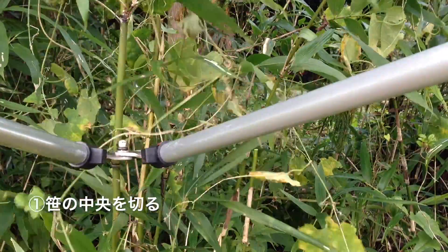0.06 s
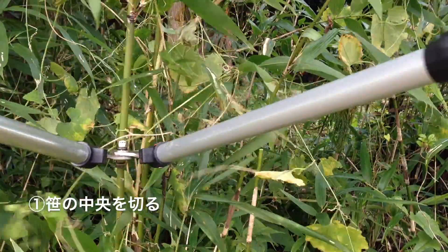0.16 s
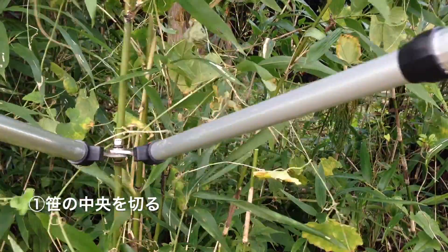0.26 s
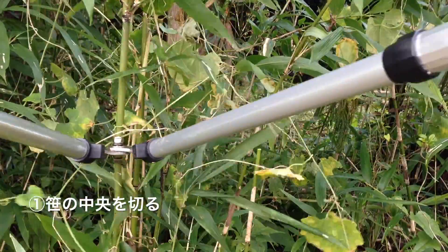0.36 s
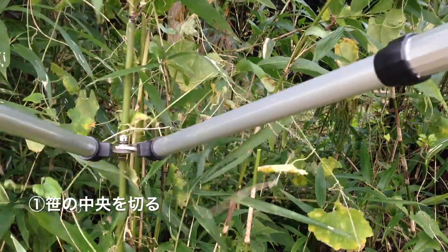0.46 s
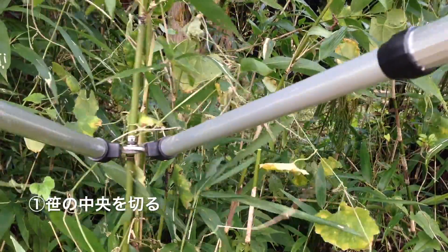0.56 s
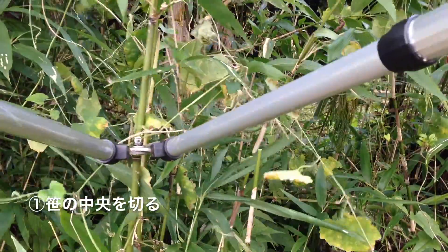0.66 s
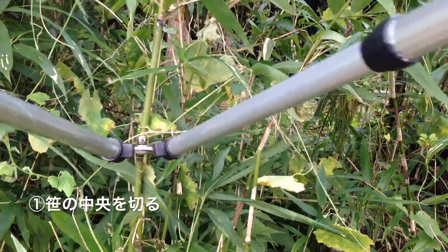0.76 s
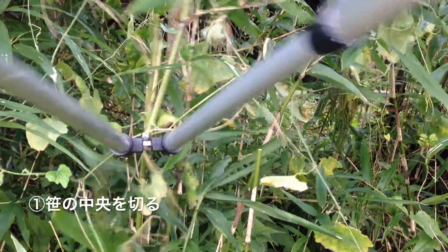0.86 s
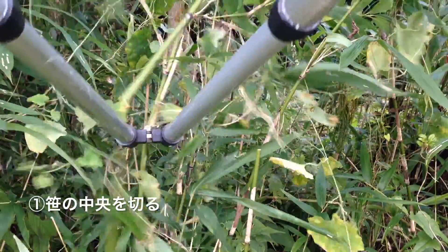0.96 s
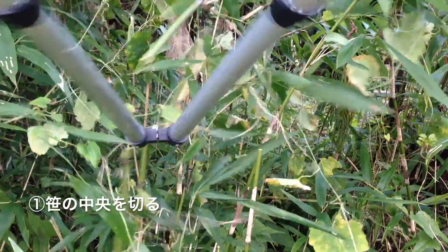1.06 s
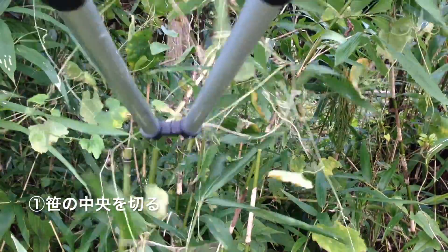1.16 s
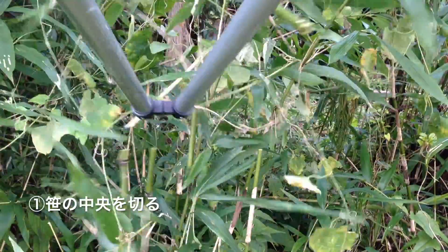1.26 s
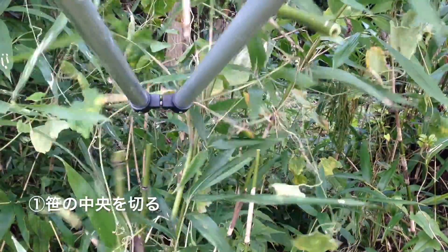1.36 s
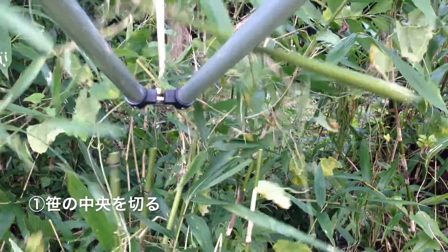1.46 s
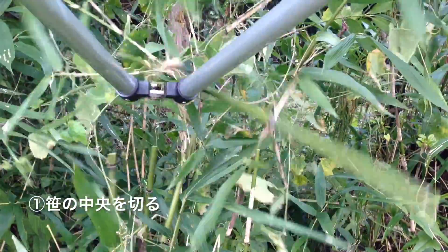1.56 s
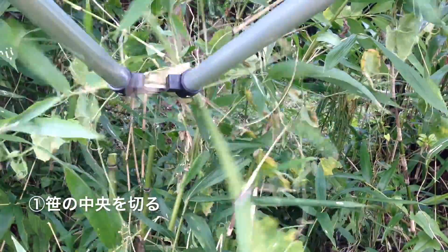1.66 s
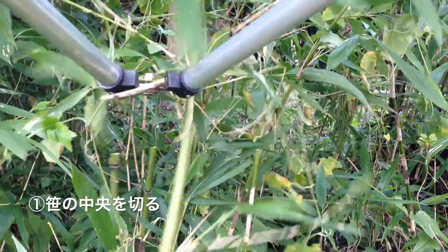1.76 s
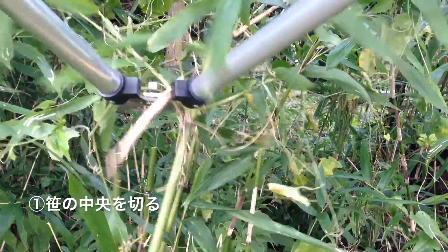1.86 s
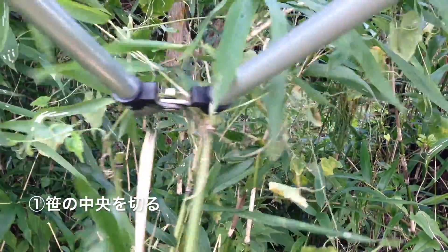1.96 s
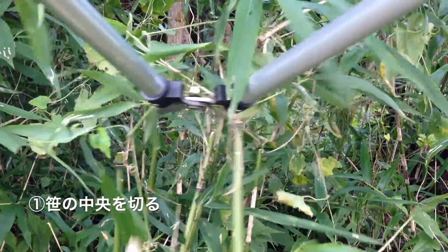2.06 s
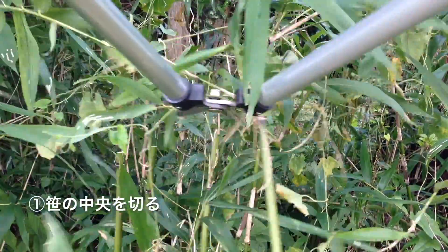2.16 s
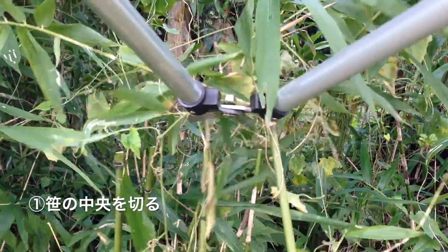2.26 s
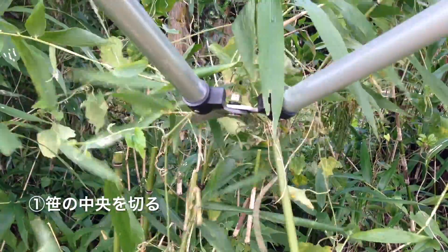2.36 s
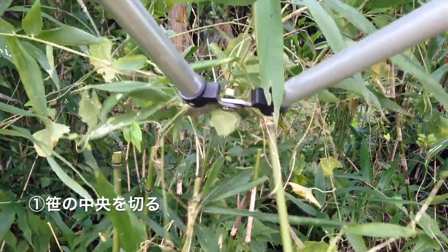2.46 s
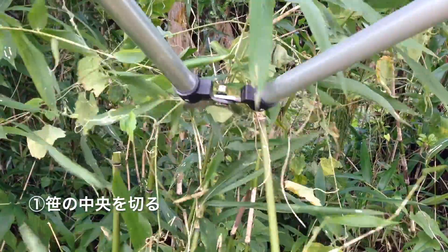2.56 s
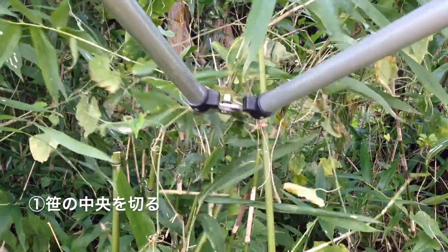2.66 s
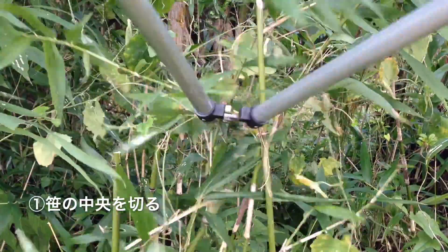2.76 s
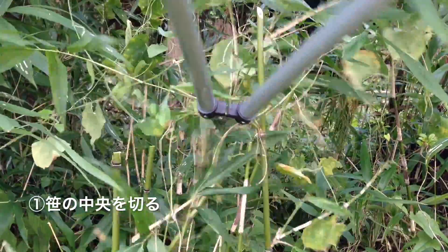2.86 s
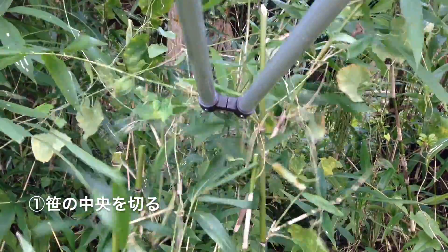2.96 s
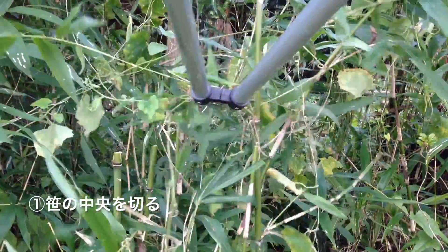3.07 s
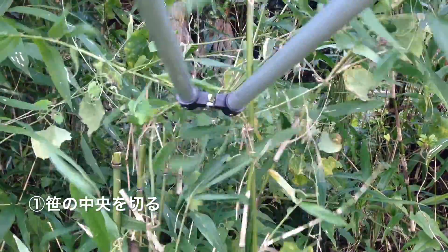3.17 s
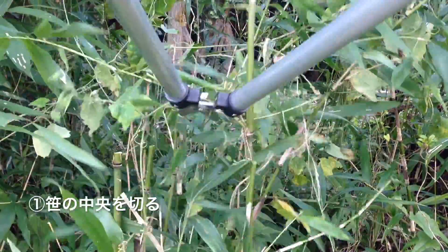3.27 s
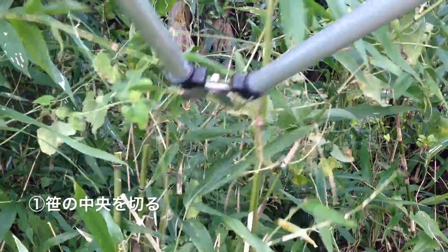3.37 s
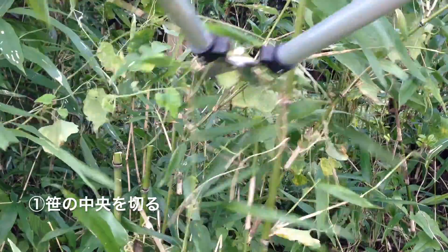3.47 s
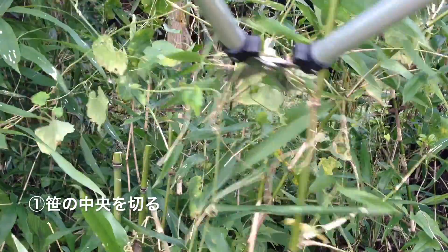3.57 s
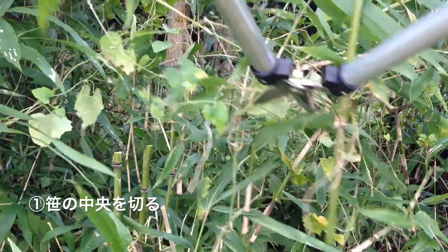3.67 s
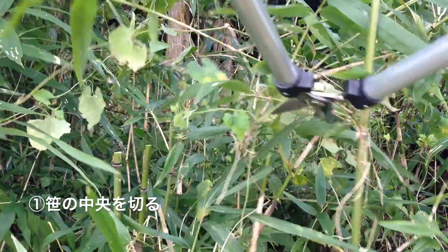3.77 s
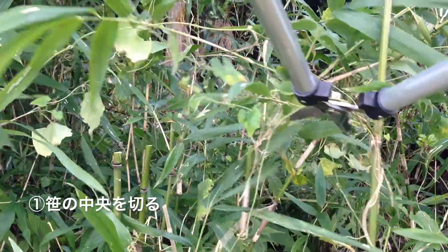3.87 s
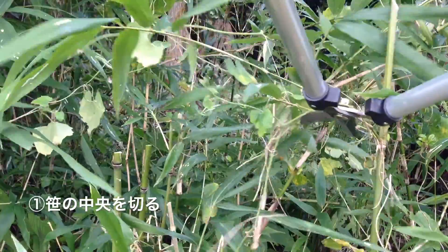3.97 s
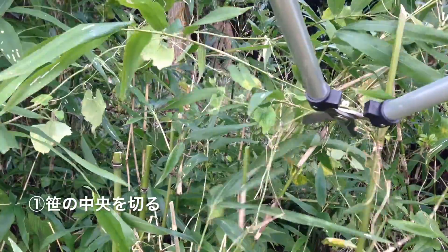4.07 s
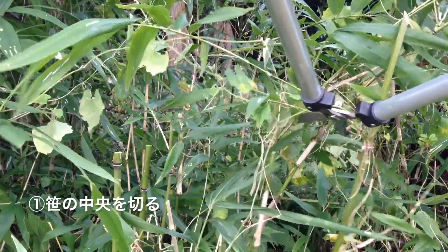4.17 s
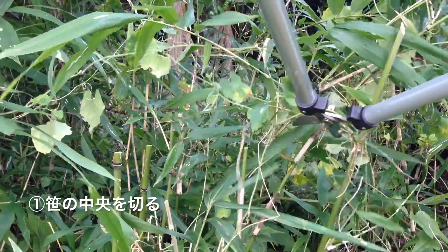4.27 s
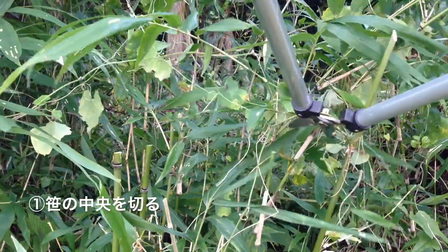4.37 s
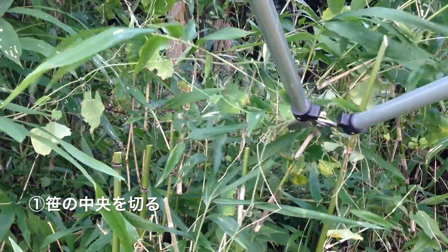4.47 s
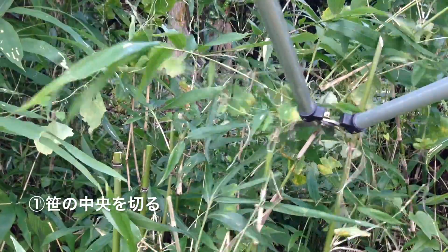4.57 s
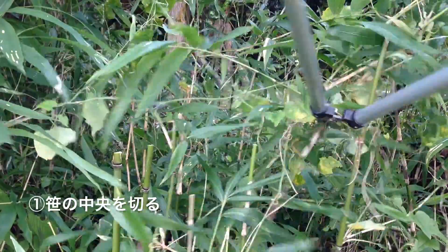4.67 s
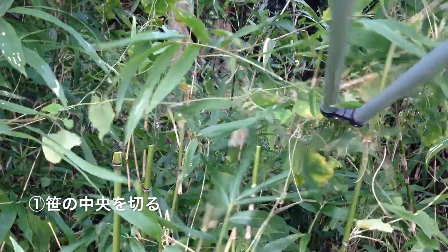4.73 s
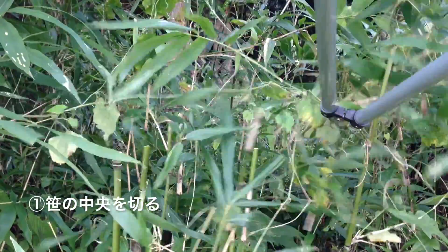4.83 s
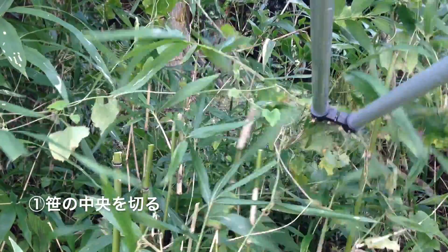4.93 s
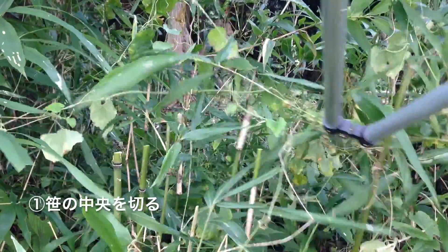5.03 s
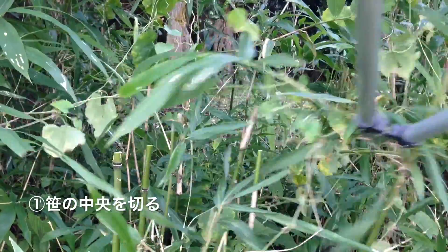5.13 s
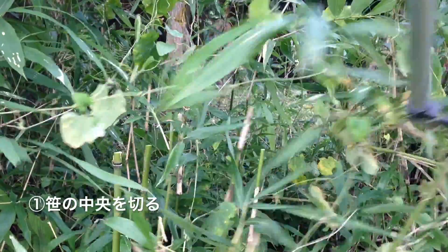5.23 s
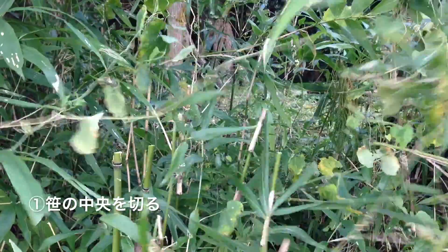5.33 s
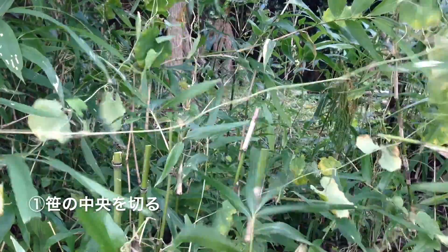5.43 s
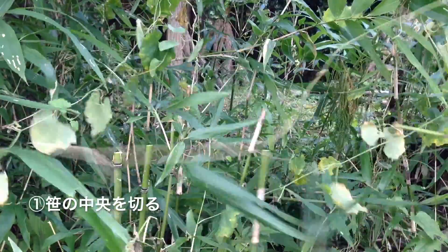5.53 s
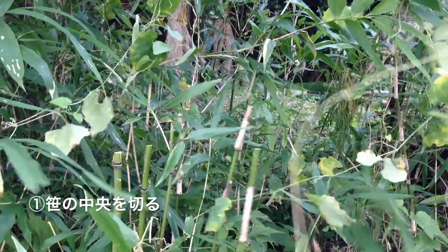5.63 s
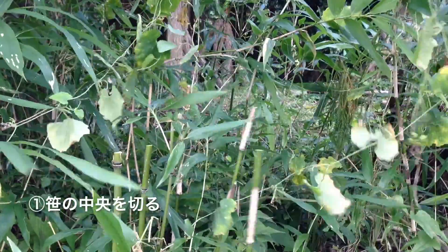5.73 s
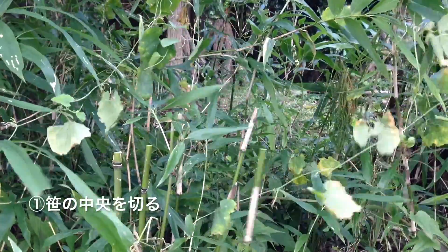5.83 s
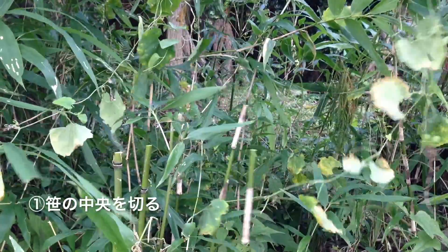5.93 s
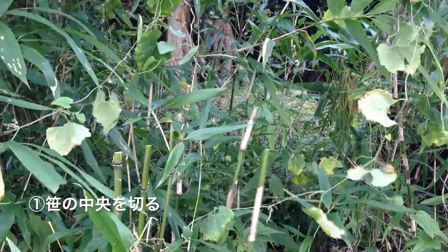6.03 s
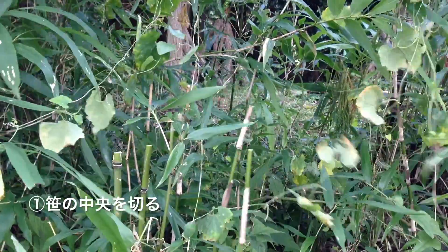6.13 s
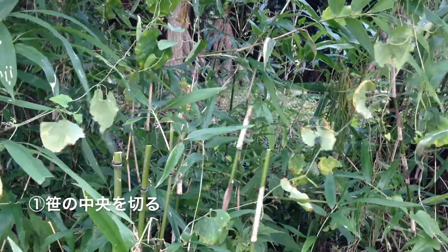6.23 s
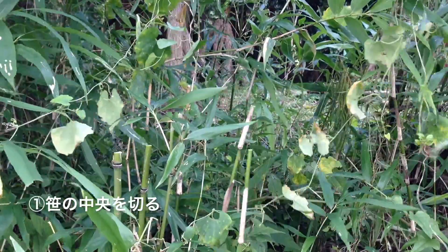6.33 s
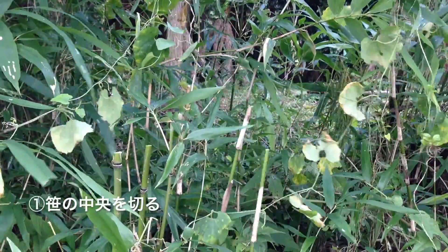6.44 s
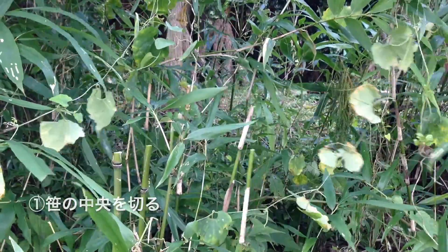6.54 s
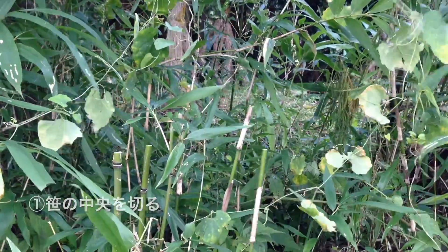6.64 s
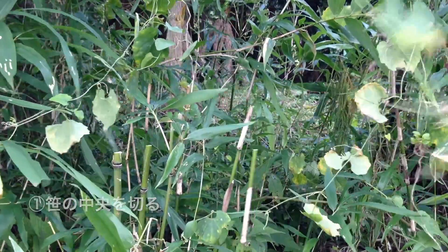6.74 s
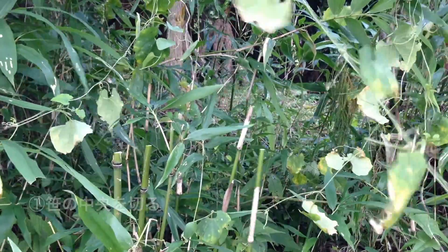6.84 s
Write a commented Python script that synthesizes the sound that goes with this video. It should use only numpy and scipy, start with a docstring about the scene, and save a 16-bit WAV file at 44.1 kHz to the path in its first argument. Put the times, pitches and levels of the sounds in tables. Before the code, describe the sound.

Close, dry snaps and tearing fibres as cutters sever bamboo three times, leaves swishing between cuts over a soft, low far-off engine drone.

```python
"""Long-handled loppers cut three bamboo stems in a thicket, close by: runs of cracks and tearing fibres,
made of filtered click bursts that ring the tool's damped modes, with bumps, creaks and chirps of the blades.
After the first cut, canes knock with modes of their own. Leaves rustle and flick as filtered noise and ticks.
Behind them a far engine hums as wavering harmonics over filtered-noise outdoor air."""
import sys
import numpy as np
from scipy import signal
from scipy.fft import rfft, irfft
from scipy.io import wavfile

SR = 44100
rng = np.random.default_rng(int(sys.argv[2]) if len(sys.argv) > 2 else 0)


def wav_record(signal):
    """Record a signal, one row per channel, as 16-bit PCM in the file named by sys.argv[1]."""
    frames = np.transpose(np.atleast_2d(signal))
    bounded = np.clip(frames, -1, 1)
    # unit amplitude maps onto the largest positive 16-bit level
    quanta = np.round(bounded * 32767).astype(np.int16)
    wavfile.write(sys.argv[1], SR, quanta)


N = 304290
TIME = np.arange(N) / SR
HIT = TIME[:8192]  # time axis of one short event
LEAD_S = 0.004  # room for fibres giving before an event's nominal time

# damped modes of tool and clamped stem: hz, relative_db, t60_s
TOOL_MODES = [(185, 0, 0.052), (390, -5, 0.042), (450, -15, 0.055), (550, -13, 0.037), (678, -16, 0.055),
              (1214, 6, 0.046), (1330, 2, 0.035), (1560, -4, 0.035), (1760, 4, 0.016), (1800, -4, 0.047),
              (1970, -13, 0.067), (2380, -19, 0.042), (2990, -5, 0.041), (3320, 1, 0.028),
              (4360, -3, 0.033), (5470, 6, 0.015)]
# spectral outline of a crack's low thump: hz, gain_db
THUD_OUTLINE = [(30, -30), (90, -4.5), (170, -3), (280, -5.5), (420, 4), (680, 0.5), (950, -8.5),
                (1800, -54)]
# spectral outline of a crack's woody middle: hz, gain_db
WOOD_OUTLINE = [(500, -26.5), (950, -12.5), (1250, -4), (1700, 0.5), (2200, -5), (2700, -4), (4500, -18),
                (9000, -39.5)]
# spectral outline of a crack's bright splinters: hz, gain_db
SPLINTER_OUTLINE = [(1200, -27.5), (2500, -3.5), (3800, 5), (6000, -2), (9000, -1.5), (12000, -9.5),
                    (16000, -2)]


def undb(db):
    """Decibels to gain."""
    return 10 ** (np.asarray(db) / 20)


def unit(x):
    """Scale to rms 1."""
    return x / np.sqrt(np.mean(x ** 2))


def attack_level(x, db):
    """Set the rms of the six milliseconds after a hit's lead-in."""
    start = int(LEAD_S * SR)
    return x * undb(db) / np.sqrt(np.mean(x[start:start + 265] ** 2))


def curve(table):
    """Join (time_s, value) points by straight lines."""
    time_s, value = np.transpose(table)
    return np.interp(TIME, time_s, value)


def colour(x, outline):
    """Minimum-phase filter with the given (hz, gain_db) outline, built by folding the cepstrum."""
    hz, db = np.transpose(outline)
    grid_hz = np.maximum(np.fft.rfftfreq(4096, 1 / SR), 1)
    gain_db = np.interp(np.log(grid_hz), np.log(hz), db)
    cepstrum = irfft(np.log(undb(gain_db)))
    half = len(cepstrum) // 2
    cepstrum[1:half] *= 2
    cepstrum[half + 1:] = 0
    impulse = irfft(np.exp(rfft(cepstrum)))[:half]
    return signal.fftconvolve(x, impulse)[:len(x)]


def walk(rate_hz):
    """Random values joined by straight lines, rms 1."""
    knots_s = np.arange(0, TIME[-1] + 1, 1 / rate_hz)
    return unit(np.interp(TIME, knots_s, rng.standard_normal(len(knots_s))))


def clicks(n, rate_hz, spread_db):
    """Random tiny clicks, mostly weak and a few strong, rms 1."""
    chance = rng.random(n)
    size = rng.exponential(size=n)
    sign = rng.choice([-1, 1], n)
    return unit(sign * (chance < rate_hz / SR) * undb(spread_db * np.minimum(size, 5)) + 1e-9)


def add(out, start_s, x):
    """Mix a sound in at start_s."""
    i = int(start_s * SR)
    out[i:i + len(x)] += x[:len(out) - i]


def ring(force, modes, ring_db, ratio=1):
    """A force heard directly and through the damped modes that it excites."""
    response = 0
    for hz, db, t60_s in modes:
        decay = undb(db + ring_db - 60 * HIT / t60_s)
        response = response + decay * np.cos(2 * np.pi * hz * ratio * HIT)
    return force + signal.fftconvolve(force, response)[:len(force)]


def fracture(fade_ms, first_db, rise_ms):
    """Fibres start to give, the main break follows, and a shower of small ones dies away."""
    peak_s = LEAD_S + 0.001
    ms = (HIT - peak_s) * 1000
    envelope = np.exp(np.minimum(ms / rise_ms, -ms / fade_ms))
    fibres = clicks(len(HIT), rate_hz=12000, spread_db=2.0) * envelope
    fibres /= np.max(np.abs(fibres))
    add(fibres, peak_s, np.array([undb(first_db)]))  # main break, relative to the strongest fibre
    return fibres


def stroke(start_s, length_s, slope_db_per_s, attack_s, release_s):
    """Envelope of one push: attack, a sloping hold, release."""
    t = TIME - start_s
    attack = np.clip(t / attack_s, 0, 1)
    hold = undb(slope_db_per_s * np.clip(t, 0, length_s))
    return attack * hold * np.exp(-np.maximum(t - length_s, 0) / release_s)


def distance():
    """A far engine's low harmonics waver over soft outdoor air; the overtones swell once and fade."""
    # engine speed: time_s, cycle_rate_hz
    engine_speed = [(0, 57.6), (1.5, 58), (2.6, 58.8), (3.5, 58), (4.2, 58.96), (6.9, 60.17)]
    # firing tone at twice the cycle rate: time_s, level_db
    engine_level = [(0, -62), (.5, -61.5), (2.0, -64.5), (2.45, -70), (3.1, -62.5), (4.55, -61),
                    (5.9, -65.5), (6.55, -69), (6.9, -85)]
    # harmonics of the cycle rate: multiple, level_db, swell_rise_db
    overtones = [(3, -71.5, 7), (4, -78, 9.5), (5, -88.5, 10.5), (6, -84, 8), (7, -99, 8), (8, -94, 21.5)]
    # spectral outline of outdoor air: hz, gain_db
    air_outline = [(25, -19), (50, -3), (85, 3), (130, 2), (250, -6), (500, -8.5), (1000, -18), (3000, -17),
                   (8000, -23), (15000, -10.5)]
    swell_s, swell_width_s, air_db = 4.42, 0.85, -62.5
    swell = np.exp(-((TIME - swell_s) / swell_width_s) ** 2)
    cycle_hz = curve(engine_speed) * (1 + 0.0023 * walk(12))
    phase = 2 * np.pi * np.cumsum(cycle_hz) / SR
    hum = np.sin(2 * phase) * undb(curve(engine_level) + 0.32 * walk(5.4))
    for multiple, db, swell_db in overtones:
        waver_db = 1.6 * walk(5)
        hum += np.sin(multiple * phase) * undb(db + swell_db * swell + waver_db)
    air = unit(colour(rng.standard_normal(N), air_outline)) * undb(air_db)
    return np.sqrt(2) * hum + air  # sqrt(2): sine levels are rms


def crinkles(count):
    """Tiny buckling ticks of leaves: damped sines, each with its own pitch, size and decay."""
    out, t = np.zeros(N), HIT[:256]
    for when, pitch, size, cycles in rng.random((count, 4)):
        hz = 2400 * 6 ** pitch
        tick = np.sin(2 * np.pi * hz * t) * np.exp(-t * hz / (0.5 + cycles))
        size_db = -24 * np.sqrt(size)
        add(out, when * TIME[-1], tick * undb(size_db) * np.sqrt(hz))
    return unit(out)


def stirring():
    """Gains of leaves and twigs: slow stirring and the brushes add as powers."""
    # stirring by tool and leaning canes: time_s, leaf_level_db (before leaf_trim_db)
    stir = [(0.0, -63.5), (0.27, -58.5), (0.57, -60.5), (0.83, -62), (1.04, -48), (1.4, -48.5),
            (2.09, -54.5), (2.71, -56), (2.9, -51.5), (3.48, -53.5), (3.75, -59.5), (4.34, -58),
            (4.73, -53.5), (4.86, -48.5), (5.17, -49.5), (5.69, -45), (6.63, -51), (6.9, -44)]
    # leafy cane shaken or brushing neighbours: peak_s, leaf_level_db, twig_level_db, fade_time_constant_s
    brushes = [(.07, -54, -62.5, 0.1), (.29, -69, -56.5, .03), (.44, -62, -68, 0.091),
               (.95, -37, -47, 0.05), (1.22, -53, -54.5, 0.082), (1.52, -60, -49, .03),
               (1.62, -45.5, -47.5, 0.015), (1.825, -45, -57.5, 0.044), (1.9, -50, -60, 0.034),
               (2.25, -51, -66, 0.051), (2.43, -53, -57, 0.036), (2.761, -61, -60, 0.046),
               (2.89, -44.5, -53, 0.1), (3.58, -55, -62, 0.14), (3.97, -58, -67, 0.063),
               (4.15, -55.5, -78, 0.03), (4.78, -37, -48, 0.067), (5.25, -48, -72, 0.042),
               (5.47, -46.5, -53, 0.053), (5.8, -47, -66, 0.038), (6.15, -49.5, -52, 0.042),
               (6.775, -41.5, -55.5, 0.056)]
    leaf_trim_db, usual_stir_db = -0.24, -50
    twig_db, twig_growth = -11, 0.97  # twigs against leaves at usual stir; twig dB per leaf dB
    rise_share = 0.86  # rise time constant over fade time constant
    stir_db = curve(stir) + leaf_trim_db
    twig_stir_db = usual_stir_db + twig_db + twig_growth * (stir_db - usual_stir_db)
    leaf_power = undb(stir_db) ** 2
    twig_power = undb(twig_stir_db) ** 2
    for peak_s, leaf_level_db, twig_level_db, fade_s in brushes:
        swell = np.exp(np.minimum((TIME - peak_s) / rise_share, peak_s - TIME) / fade_s)
        leaf_power = leaf_power + (undb(leaf_level_db) * swell) ** 2
        twig_power = twig_power + (undb(twig_level_db) * swell) ** 2
    return np.sqrt(leaf_power), np.sqrt(twig_power)


def foliage():
    """Leaves slide and crinkle in uneven little swells of changing brightness; twigs scrape lower down."""
    # spectral outline of leaves: hz, gain_db
    leaf_outline = [(700, -33), (1500, -5), (2500, -5.5), (4000, 0.5), (5500, 0), (8000, 0), (11000, -1.5),
                    (15000, -3.5)]
    # spectral outline of twigs: hz, gain_db
    twig_outline = [(150, -14), (400, -3), (900, -4.5), (1600, -1.5), (2400, 0.5), (3200, -1.5),
                    (5000, -13.5)]
    leaf_gain, twig_gain = stirring()
    slide = 0
    for hz in (3000, 4500, 6700, 9500, 13500):  # bands waver independently
        band = [(hz / 4, -30), (hz / 1.5, -7), (hz, 0), (hz * 1.5, -7), (hz * 4, -30)]
        rub = colour(rng.standard_normal(N), band)
        slide = slide + rub * undb(1.8 * walk(30))
    leaves = unit(colour(unit(slide) + undb(-6.0) * crinkles(count=8000), leaf_outline))
    twigs = unit(colour(clicks(N, rate_hz=3500, spread_db=2.5), twig_outline))
    return (leaves * leaf_gain + twigs * twig_gain) * undb(1.35 * walk(55))


def flicks():
    """A stiff leaf slips free with a short papery burst."""
    # leaves flicking past stems and handles: time_s, level_db, centre_hz, fade_time_constant_ms
    leaf_flicks = [(.252, -50.5, 7140, 10), (.298, -55, 3500, 3), (0.339, -52, 10500, 4),
                   (.7795, -45, 11000, 4), (1.005, -40, 7840, 2.2), (1.1695, -39, 9100, 2.7),
                   (1.276, -43.5, 7000, 10), (1.846, -46, 5000, 3), (1.941, -48.5, 10000, 11),
                   (2.2703, -48, 8500, 3.5), (2.337, -50.5, 4000, 5), (2.389, -49, 13000, 6.5),
                   (2.415, -50, 4460, 2.6), (2.69, -53, 3900, 14), (3.632, -42, 8200, 5),
                   (3.7215, -52, 7010, 3.4), (5.4374, -36, 7640, 5.9), (5.905, -43, 11940, 7),
                   (6.022, -48, 3230, 35), (6.139, -44, 5510, 6), (6.3483, -45, 4470, 1.7),
                   (6.6307, -46.5, 6860, 16), (6.7484, -37.5, 5130, 7.3)]
    out = np.zeros(N)
    for s, db, hz, fade_ms in leaf_flicks:
        force = fracture(fade_ms, first_db=-3, rise_ms=0.29 * fade_ms)
        burst = colour(force, [(hz / 20, -20), (hz * 0.4, -9), (hz, 0), (hz * 2.44, -12)])
        add(out, s - LEAD_S, attack_level(burst, db))
    return out


def canes():
    """Cut canes strike their neighbours and scrape on; a ratio shifts the modes for each knock."""
    # loose canes knocking: time_s, level_db, pitch_ratio, strike_fade_time_constant_ms
    knocks = [(1.4646, -25, 0.96, 0.86), (1.497, -35.5, 1.03, 1.8), (1.582, -36, 1.1, 6.9),
              (1.614, -39.5, 1.2, 2.1), (1.741, -46, 1.6, 2.9), (1.751, -40, 1.38, 2.6),
              (2.061, -43, 1., 12), (2.068, -50, 1.2, 9.6), (2.455, -47, 1.17, 1.8)]
    # damped modes of a hollow cane at pitch ratio 1: hz, relative_db, t60_s
    cane_modes = [(524, -5.5, 0.03), (1294, -6.5, 0.051), (1775, -8.5, 0.022), (2080, -2, 0.026),
                  (2370, 2, 0.017), (2860, 14, 0.0094), (3170, 14.5, 0.013), (3950, 10, 0.015),
                  (4430, 10, 0.018), (7460, -5, 0.025)]
    body = [(60, -27), (250, -18), (600, -3.5), (2000, 0.5), (4500, -10), (8000, -3), (15000, -7)]
    out = np.zeros(N)
    for s, db, ratio, strike_fade_ms in knocks:
        strike = fracture(strike_fade_ms, first_db=5.0, rise_ms=0.34)
        scrape = undb(-19) * fracture(12, first_db=-13, rise_ms=2.8)
        knock = ring(strike + scrape, cane_modes, ring_db=-14, ratio=ratio)
        add(out, s - LEAD_S, attack_level(colour(knock, body), db))
    return out


def creak():
    """Dense stick and slip of steel on stem, heard through the tool, growing with the load."""
    # blade creaking under load: start_s, length_s, start_level_db
    creaks = [(0.779, 0.15, -52), (3.155, 0.087, -60.5)]
    slope_db_per_s, attack_s, release_s = 35, 0.01, 0.037
    slips = ring(clicks(N, rate_hz=1500, spread_db=2.5), TOOL_MODES, ring_db=-49)
    body = colour(slips, [(80, -10), (200, 1.0), (500, 1.5), (900, -6.5), (1400, -0.5), (2000, -2.5),
                          (2800, -18), (8000, -15)])
    push = sum(undb(db) * stroke(s, length_s, slope_db_per_s, attack_s, release_s)
               for s, length_s, db in creaks)
    return unit(body) * push


def chirps():
    """A slipping blade rings for a few cycles on one pitch."""
    # blade chattering against steel or stem: start_s, peak_level_db, pitch_hz, ring_time_constant_ms
    chatters = [(1.112, -39, 1740, 3.2), (1.124, -32, 1650, 4.5), (4.776, -34.5, 2010, 6.5),
                (4.8, -31, 1630, 4.2)]
    out = np.zeros(N)
    for s, db, hz, ring_ms in chatters:
        ms = HIT * 1000
        swell = (1 - np.exp(-ms / 0.83)) * np.exp(-ms / ring_ms)
        tone = np.sqrt(2) * np.sin(2 * np.pi * hz * HIT)
        add(out, s, undb(db) * swell / swell.max() * tone)
    return out


def tearing():
    """Fibres part in a dense, uneven run that weakens as the blade passes through."""
    # tears: start_s, length_s, wood_start_level_db, thud_re_wood_db, splinter_re_wood_db
    tears = [(0.909, 0.035, -27.5, -9.5, -4), (.96, 0.028, -31.5, -7, 0), (1.119, 0.051, -36.5, -7.5, -3),
             (2.898, 0.01, -37.5, -2, -5), (2.924, 0.024, -34.5, -7.5, -3), (2.957, 0.011, -38, -4, 0.5),
             (4.745, 0.044, -36.5, -13.5, 4)]
    slope_db_per_s, attack_s, release_s = -72, 0.0015, 0.0049
    uneven = clicks(N, rate_hz=9800, spread_db=2.5) * undb(2.3 * walk(300))
    fibres = ring(uneven, TOOL_MODES, ring_db=-56)
    thud = unit(colour(fibres, THUD_OUTLINE))
    wood = unit(colour(fibres, WOOD_OUTLINE))
    splinter = unit(colour(fibres, SPLINTER_OUTLINE))
    out = np.zeros(N)
    for s, length_s, db, thud_db, splinter_db in tears:
        push = undb(db) * stroke(s, length_s, slope_db_per_s, attack_s, release_s)
        out += push * (wood + undb(thud_db) * thud + undb(splinter_db) * splinter)
    return out


def crack(db, thud_db, splinter_db, fade_ms, bright):
    """One crack thumps the handles, rings the tool and sprays bright splinters."""
    parts = ((THUD_OUTLINE, thud_db, 1), (WOOD_OUTLINE, 0, bright), (SPLINTER_OUTLINE, splinter_db, bright))
    out = 0
    for outline, part_db, shift in parts:
        force = fracture(fade_ms, first_db=-4.5, rise_ms=0.48 + 0.26 * fade_ms)
        part = colour(force, np.array(outline) * [shift, 1])
        out = out + attack_level(ring(part, TOOL_MODES, ring_db=-49), db + part_db)
    return out


def cuts():
    """Stem walls snap, the handles jolt as the first stem gives way, and the jaws bump stems lightly."""
    # stem wall breaks: time_s, wood_level_db, thud_re_wood_db, splinter_re_wood_db,
    # fade_time_constant_ms, brightness_frequency_ratio
    snaps = [(0.8801, -29, -1, 2, 2.4, 0.95), (0.9123, -24.5, -10.5, 4.5, 2.4, 1.22),
             (0.939, -21, -12, -6.5, 2.8, 1.07), (.945, -25, -8, -3.5, 4.2, 1.5),
             (1.1325, -22, -4.5, -2.5, 4.1, 0.96), (2.8886, -31, -18, -3.5, 1.5, 0.93),
             (2.909, -32, -3, -16, 2.3, 1.25), (2.9126, -29.5, -1.5, 4.5, 3.9, 1.12),
             (2.933, -25.5, -14, -2, 2.1, 1), (4.7211, -30, -13.5, -0.5, 2, 1.02),
             (4.754, -32, -7, 6, 3.4, 0.82), (4.7964, -28.5, -8.5, -17, 3.2, 1.03),
             (4.8005, -31, -19, -5.5, 2.7, 1.1)]
    # jaws bumping a stem: time_s, wood_level_db, brightness_frequency_ratio
    bumps = [(0.778, -49, 0.64), (1.1117, -43.5, .95), (1.266, -48.5, 0.95), (3.054, -47, 0.82),
             (3.3963, -53.5, 1.5), (3.522, -53.5, 0.93), (4.878, -41, 0.94), (6.412, -47.5, 1.26)]
    # handle jolts: time_s, level_db
    jolts = [(0.8796, -30.5), (0.912, -27), (0.9386, -41)]
    # spectral outline of a jolt: hz, gain_db
    jolt_outline = [(30, -28), (80, -6), (150, 2), (230, -3.5), (300, -3), (400, -9), (900, -34.5)]
    out = np.zeros(N)
    for s, *snap in snaps:
        add(out, s - LEAD_S, crack(*snap))
    for s, db, bright in bumps:
        add(out, s - LEAD_S, crack(db, thud_db=-7, splinter_db=-9, fade_ms=3.1, bright=bright))
    for s, db in jolts:
        jolt = colour(fracture(2.8, first_db=2.0, rise_ms=0.6), jolt_outline)
        add(out, s - LEAD_S, attack_level(jolt, db))
    return out


def thicket(x, wet_db, t60_s):
    """Stems and ground scatter a short, thin tail of decaying noise."""
    tail = rng.standard_normal(len(HIT)) * undb(-60 * HIT / t60_s) * (HIT > 0.004)
    tail /= np.sqrt(np.sum(tail ** 2))
    return x + undb(wet_db) * signal.fftconvolve(x, tail)[:N]


def scene():
    """Close work in the thicket over the distant background."""
    work = cuts() + tearing() + chirps() + canes() + flicks() + creak()
    close = thicket(work, wet_db=-11.5, t60_s=0.1)
    return (close + foliage() + distance())[None]


def record(dry):
    """Steep elliptic low-pass at 15.5 kHz."""
    return signal.sosfilt(signal.ellip(10, 0.2, 70, 15500, fs=SR, output="sos"), dry)


dry = scene()
out = record(dry)
wav_record(out)
```